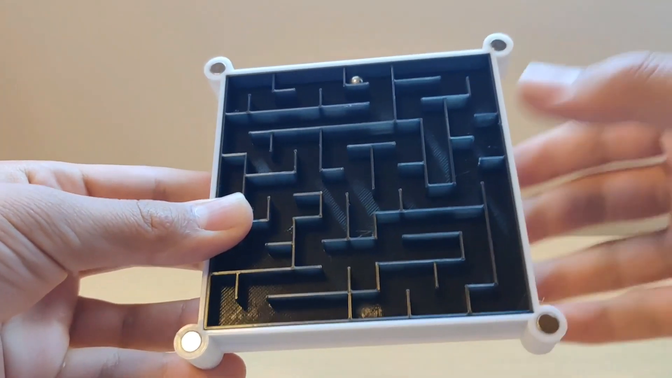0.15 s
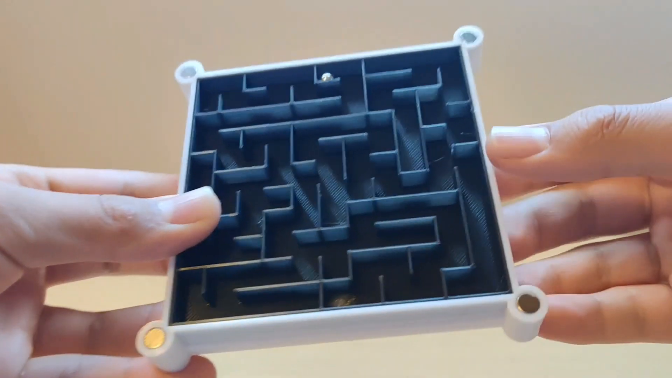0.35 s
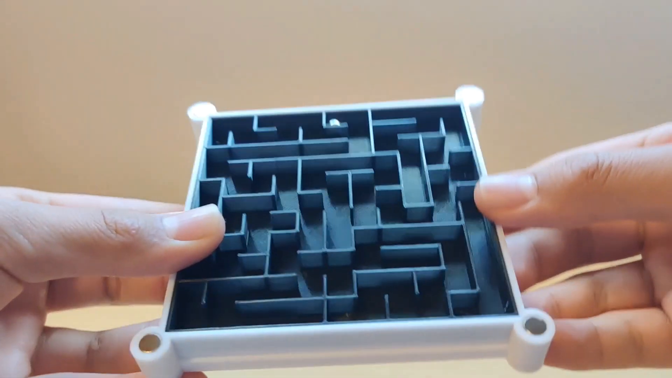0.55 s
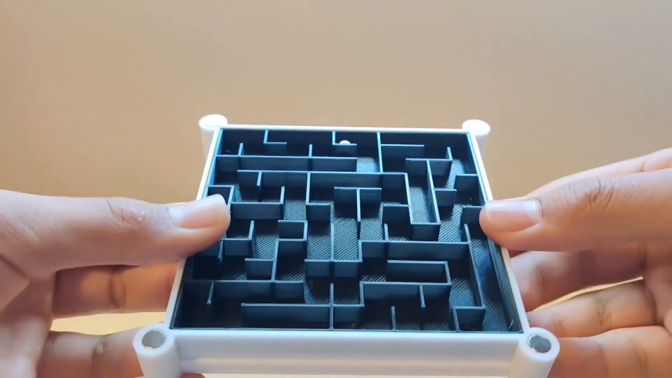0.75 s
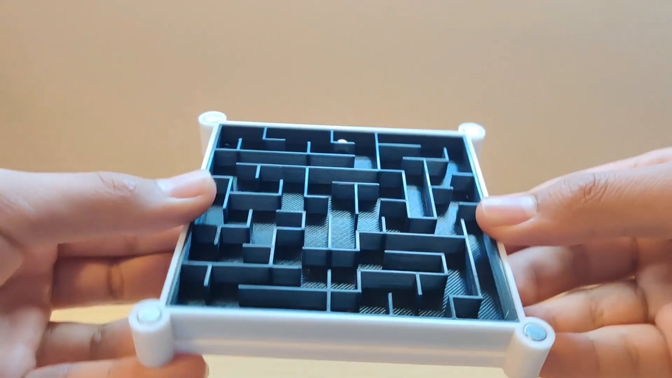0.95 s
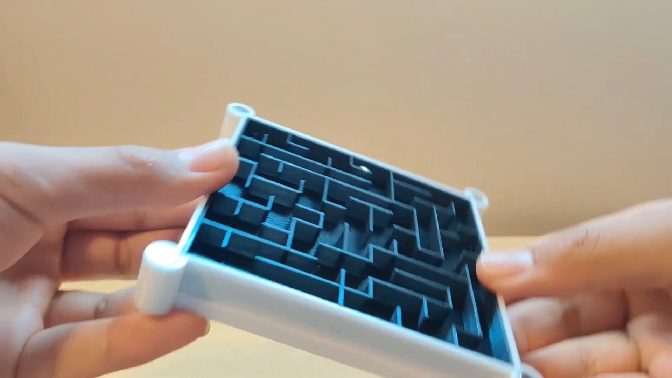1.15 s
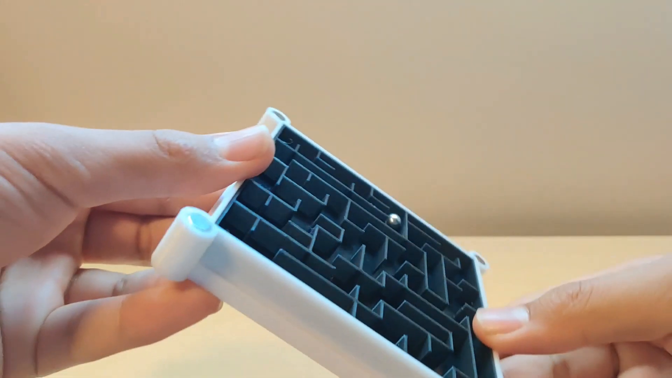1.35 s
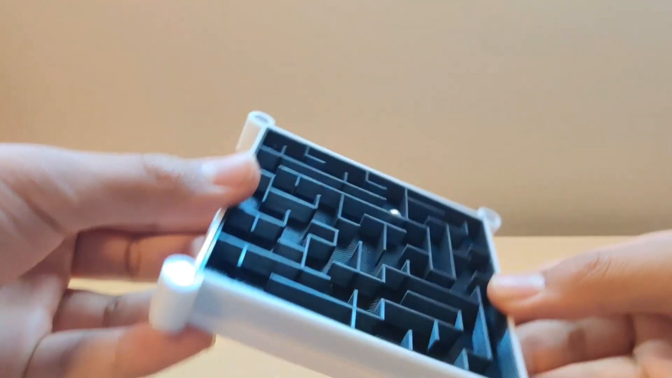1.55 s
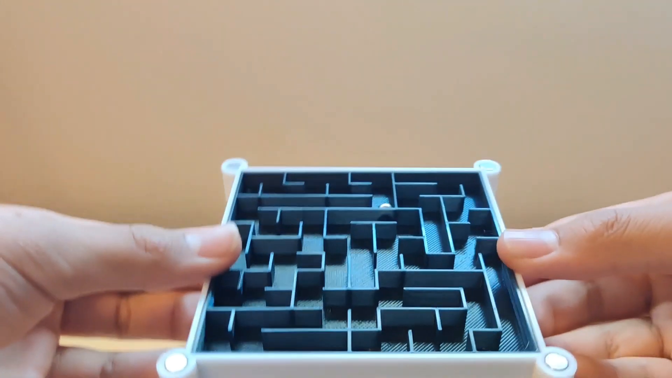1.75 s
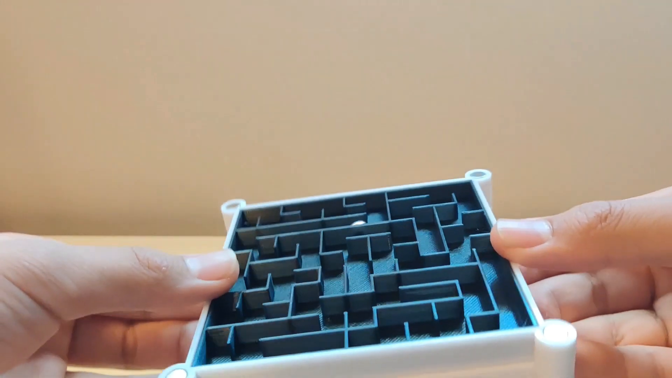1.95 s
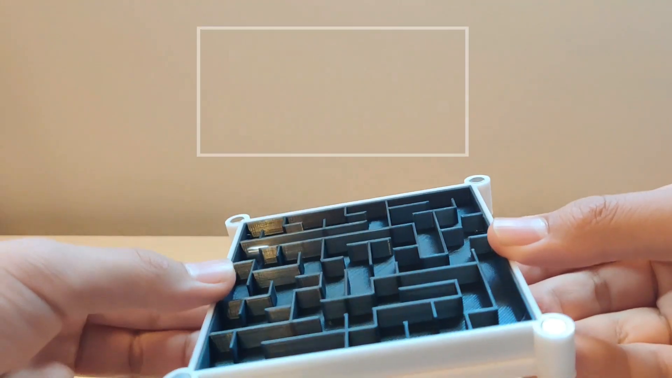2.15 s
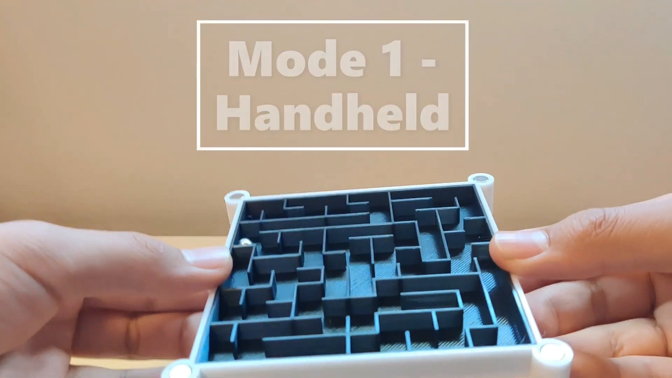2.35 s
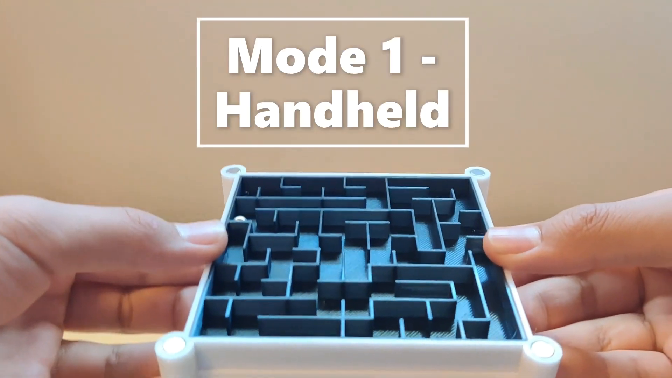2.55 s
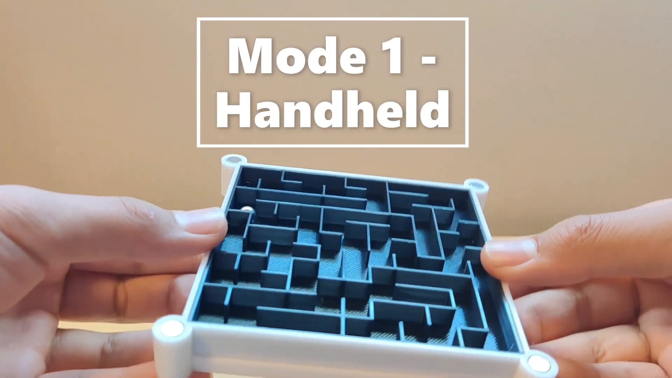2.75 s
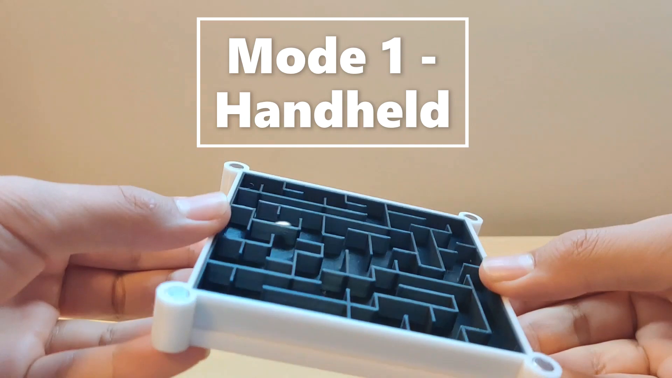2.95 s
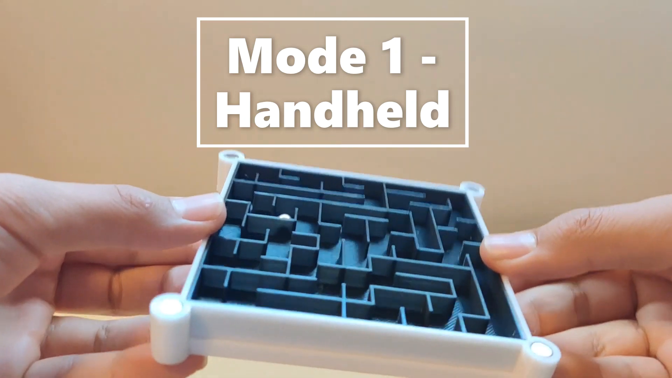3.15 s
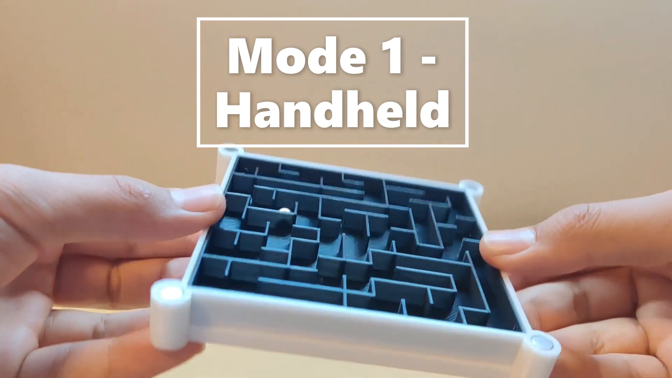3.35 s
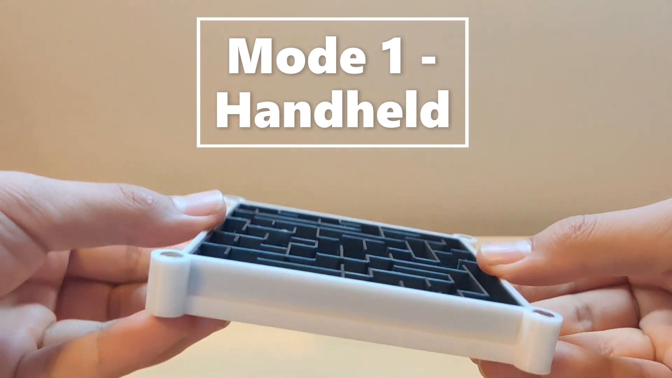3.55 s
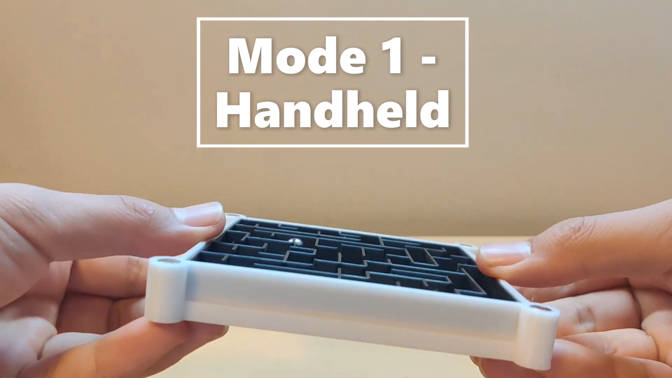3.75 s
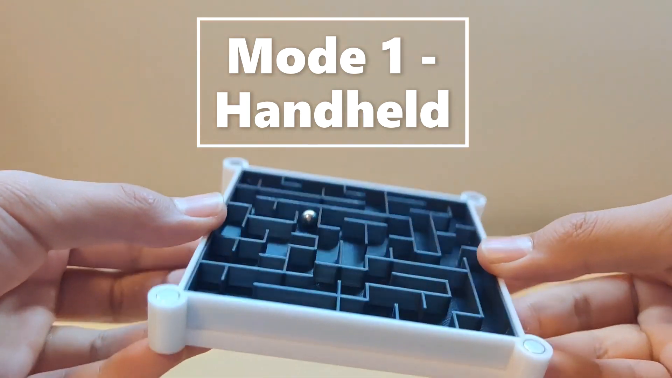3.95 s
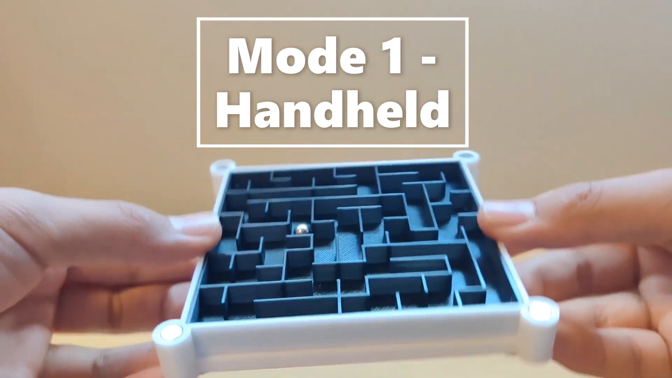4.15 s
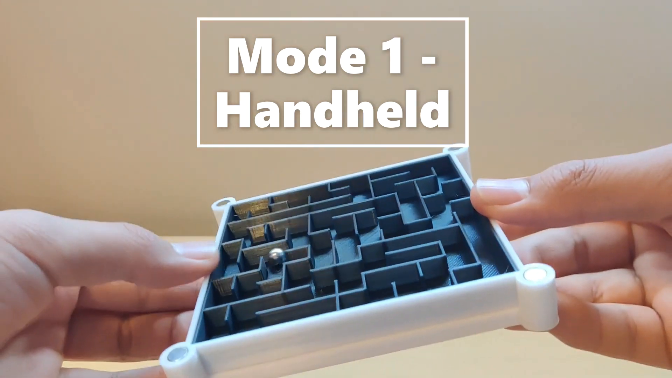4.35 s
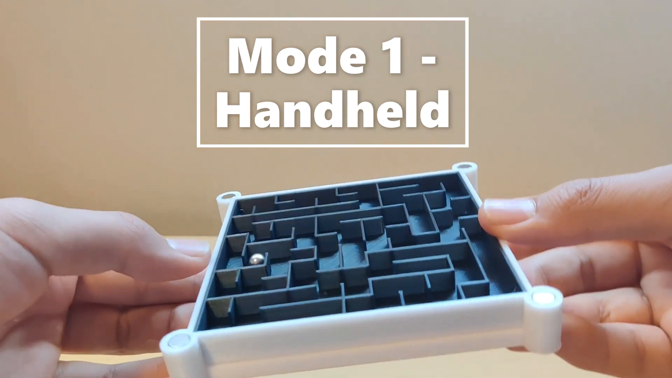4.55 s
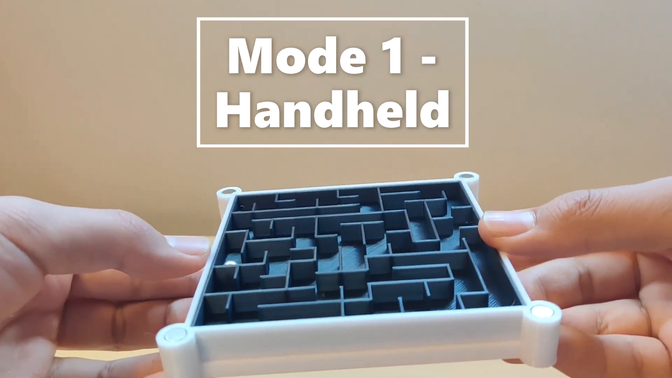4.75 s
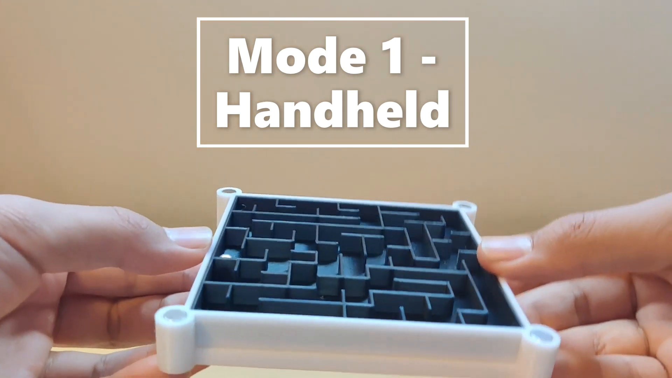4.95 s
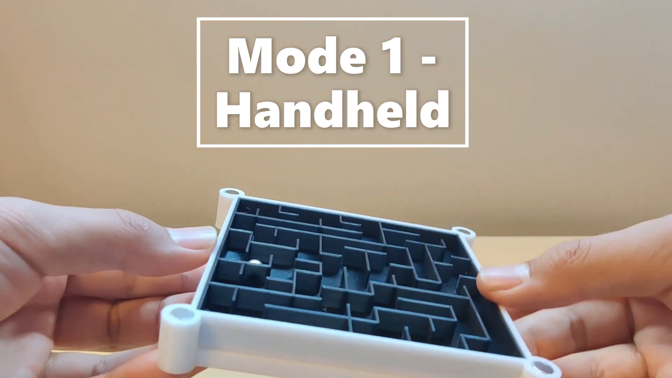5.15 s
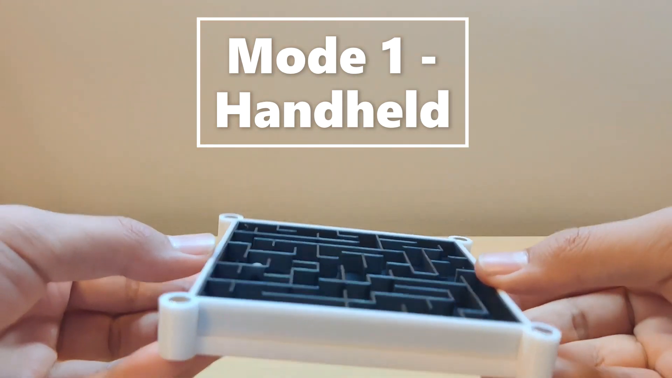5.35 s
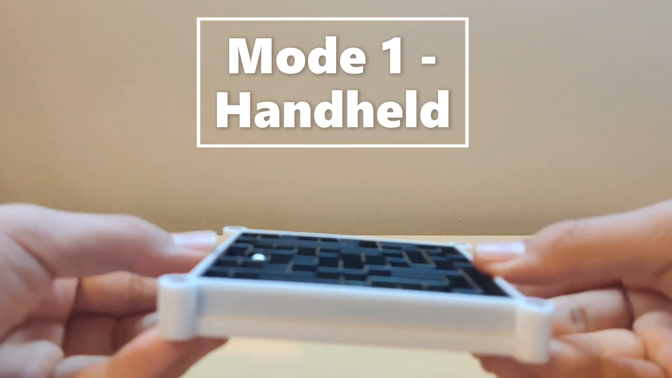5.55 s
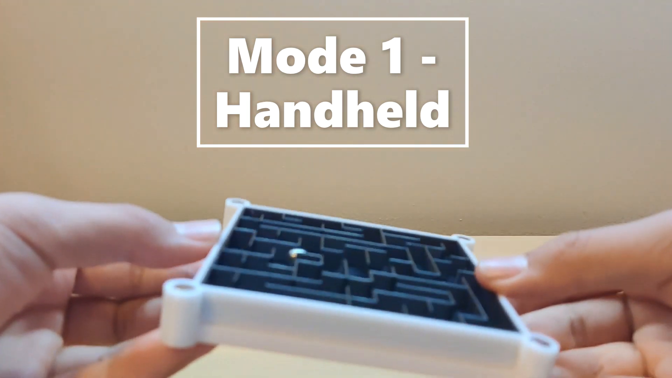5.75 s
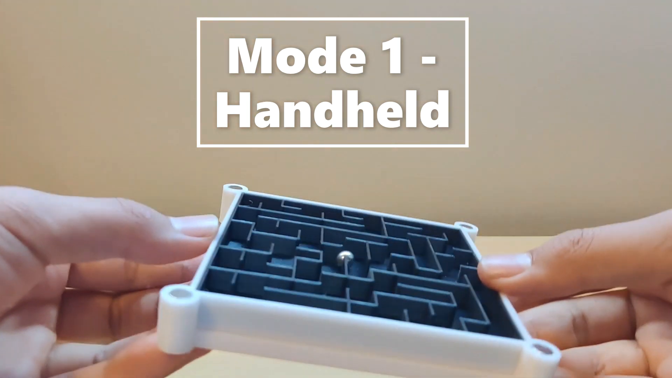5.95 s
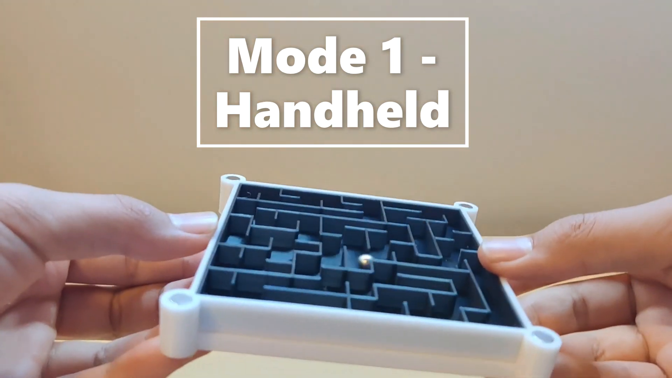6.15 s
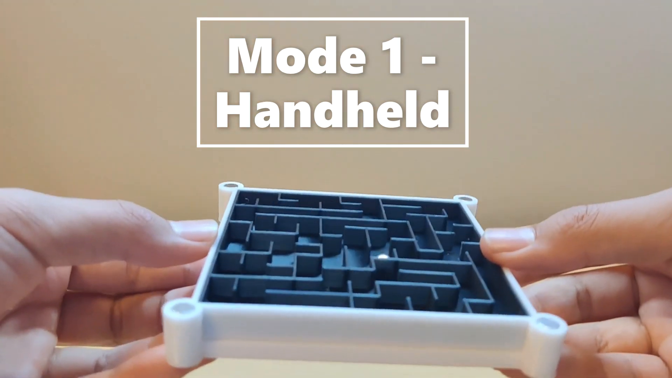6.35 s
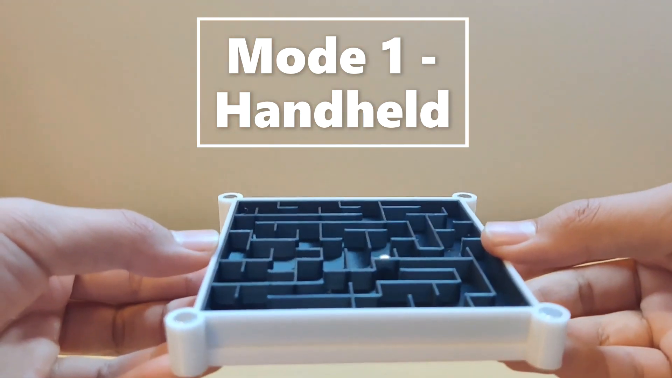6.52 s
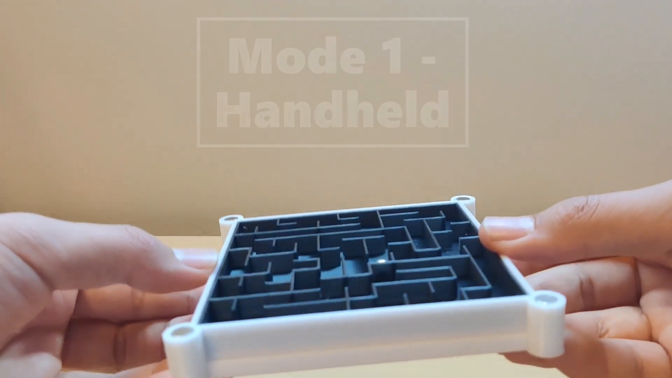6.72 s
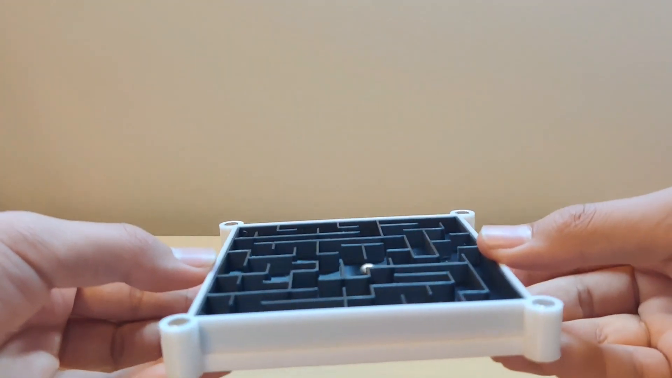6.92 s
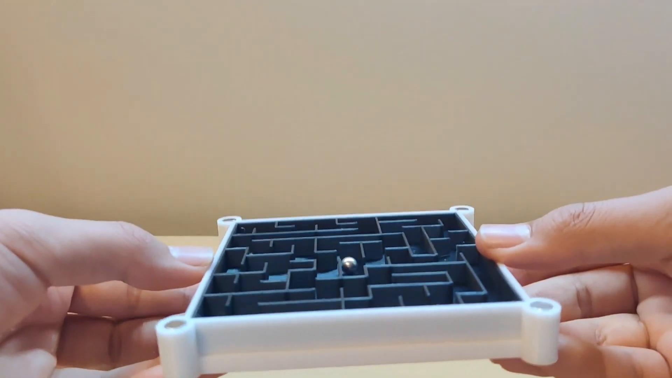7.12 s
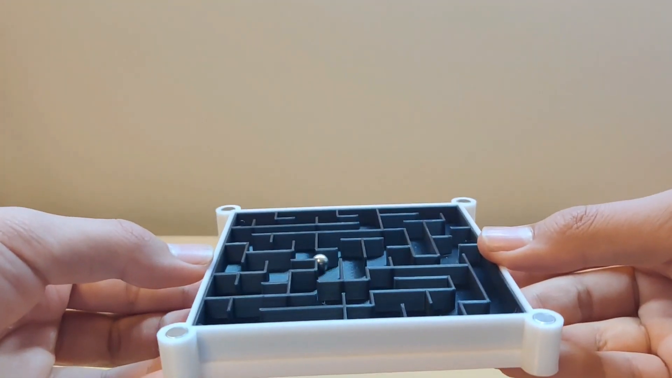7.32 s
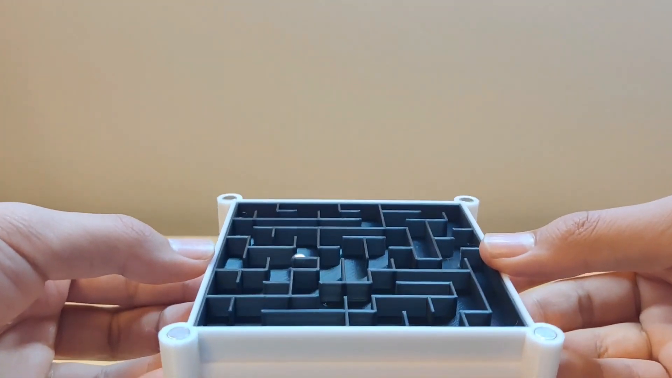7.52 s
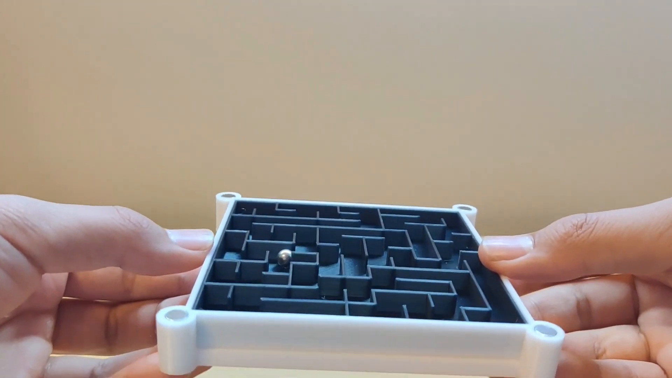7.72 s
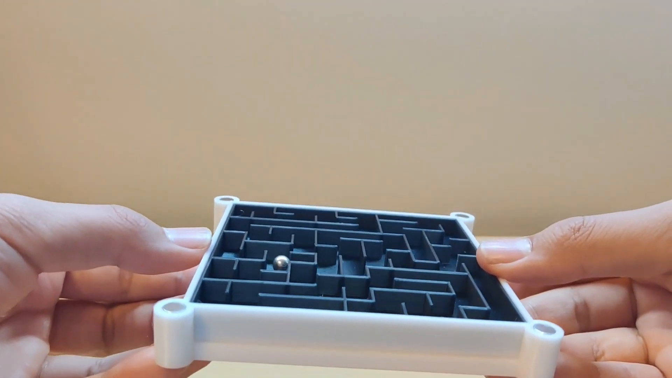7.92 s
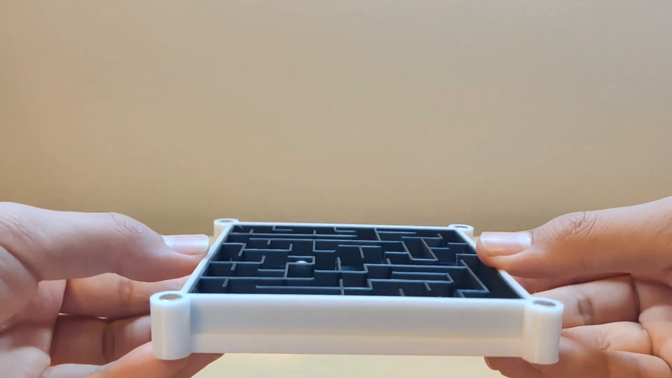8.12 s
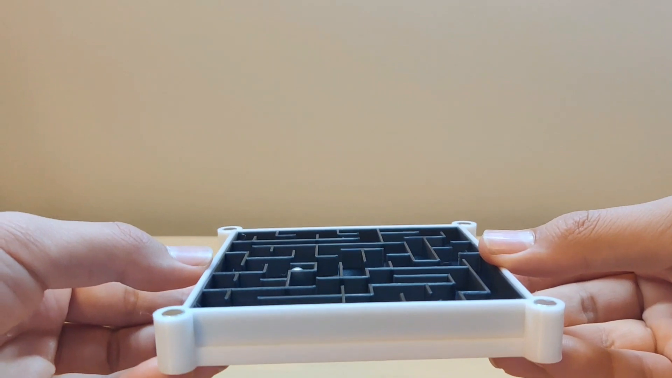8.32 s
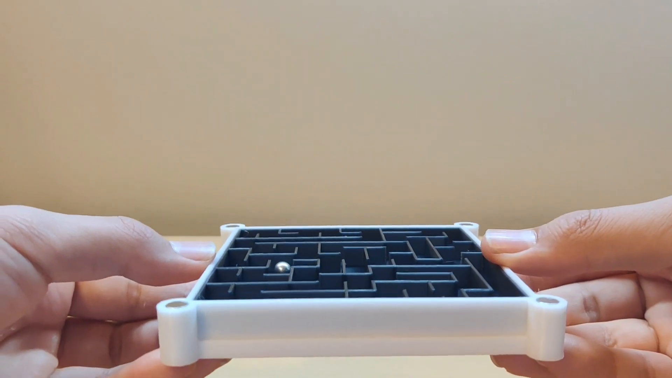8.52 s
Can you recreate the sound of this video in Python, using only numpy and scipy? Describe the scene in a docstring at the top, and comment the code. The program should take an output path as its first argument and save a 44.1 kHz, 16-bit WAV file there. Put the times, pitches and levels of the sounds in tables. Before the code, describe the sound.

A small steel ball rattles and clicks through a hand-tilted plastic maze, rolling in short bursts over a steady low fan hum.

```python
"""Over a fan that hums steadily from start to end, a faint knock opens the scene.
From 1.3 s a small steel ball runs through a hand-held plastic maze, close by in a small room, in bursts of runs.
It drums and grinds over the ribbed floor, knocks against the walls and rebounds; knocks and ribs are short
contacts that ring the damped modes of the tray. A deep rumble swells near 3.3, 6.5 and 7.3 s.
The last runs and knocks, past 8 s, are faint and leave the fan and the hiss of the microphones."""
import sys
import numpy as np
from scipy import signal
from scipy.fft import rfft, irfft, next_fast_len
from scipy.io import wavfile
from scipy.ndimage import uniform_filter1d

SR = 44100
rng = np.random.default_rng(int(sys.argv[2]) if len(sys.argv) > 2 else 0)


def store_pcm(level_fs):
    """Save levels as 16-bit WAV."""
    pcm = np.round(np.clip(level_fs, -1, 1) * 32767).astype(np.int16)
    wavfile.write(sys.argv[1], SR, np.atleast_2d(pcm).T)


N = 378378
TIME = np.arange(N) / SR

# Ball meets wall. Each row: time in seconds, pitch of that wall in Hz, strength in dB,
# hardness of the contact in dB per octave.
KNOCKS = [(0.39, 7250, -69, -3), (1.2045, 2830, -71.5, -7), (1.333, 4750, -57.5, -4.5),
          (1.3591, 5000, -38, 1.5), (1.378, 8450, -46, -1), (1.4009, 4900, -41.5, 1),
          (1.4406, 4940, -42, 1.5), (1.465, 5460, -46, 0.5), (1.5829, 5300, -35.5, 2.5),
          (1.6635, 4660, -45.5, 1.5), (1.704, 9200, -53.5, 1), (1.7257, 9150, -58.5, -2.5),
          (2.283, 6575, -33.5, 3.5), (2.3005, 6400, -39.5, 0.5), (2.3109, 5640, -33.5, 5.5),
          (2.3733, 6500, -44.5, 4), (2.4653, 4640, -40.5, 2.5), (2.552, 4550, -47.5, 1),
          (2.605, 4730, -54.5, 2.5), (2.6275, 6600, -62, 2), (2.9608, 12700, -44, 4),
          (2.976, 4690, -51, -3), (3.0132, 8600, -39.5, 2.5), (3.036, 6476, -47.5, 1),
          (3.0596, 8500, -42.5, 4), (3.0811, 8200, -44, -1.5), (3.161, 8250, -52, -1),
          (3.1795, 6670, -47.5, -1), (3.231, 6300, -60.5, -2.5), (3.256, 6694, -67, -2),
          (3.787, 6620, -42, 3), (3.879, 8000, -48.5, 2.5), (3.916, 6765, -44, 2.5),
          (4.0304, 6750, -49.5, 1), (4.072, 6655, -62, 4), (4.1996, 6640, -34.5, 1.5),
          (4.308, 7595, -44.5, -0.5), (4.4025, 7080, -41, 2.5), (4.4956, 6762, -43, 2),
          (4.5522, 8000, -40.5, 0), (4.5883, 7170, -50, -0.5), (4.6246, 7870, -44, 3),
          (4.716, 4571, -43, -0.5), (4.804, 8550, -51, 0.5), (4.823, 4560, -46, 0), (4.861, 7483, -63, 2),
          (4.969, 4700, -71.5, -6), (5.1645, 6797, -64, -4), (5.22, 7102, -43, 1), (5.2925, 7010, -55, -3),
          (5.323, 7108, -61.5, -4.5), (5.6298, 8040, -42.5, 1.5), (5.7324, 8259, -50, 2.5),
          (5.7863, 6892, -59, 0), (5.9005, 7850, -50, -1), (5.93, 4708, -52.5, -1), (5.9735, 8526, -34, 4),
          (6.0808, 5624, -59.5, -3), (6.1105, 8470, -43.5, 2), (6.255, 4799, -39, 0),
          (6.3344, 7510, -43, 4), (6.4001, 4790, -53, -3), (6.457, 7767, -57, -2.5),
          (7.0163, 2989, -67.5, -8), (7.111, 7220, -44.5, 3.5), (7.269, 2933, -66, -6.5),
          (7.312, 7730, -60, 2.5), (7.3864, 4930, -44, 0), (7.4255, 4770, -60, 0.5),
          (7.481, 4959, -53.5, 0.5), (7.53, 6610, -63, -1), (8.0536, 7700, -55, -2),
          (8.094, 9086, -57.5, -0.5), (8.2232, 4513, -53.5, -2.5), (8.277, 7543, -62.5, -1.5)]
# Borders between body, knock, click and snap of a knock, in Hz.
KNOCK_EDGES_HZ = [3100, 6200, 10500]
# Colour of an average knock over its first 10 ms, from body to snap. Each row: band centre in Hz, relative level in dB.
KNOCK_COLOUR = [(2000, 0.5), (4600, -2), (7900, -1.5), (12500, -7)]
HARDNESS_PIVOT_HZ = 5930   # a harder contact lifts what lies above and thins what lies below
WALL_LIFT_DB, WALL_LIFT_OCTAVES = 5.5, 0.24   # the struck wall favours the region around its own pitch
# The struck wall's own ring: level against the tray's before the knock is coloured, decay, half-width
WALL_DB, WALL_T60_S, WALL_WIDTH_HZ = -8.5, 0.03, 490

# Modes of the tray. Each row: frequency in Hz, relative level in dB, left over right in dB.
TRAY_MODES = [(810, -5, 0), (1090, 0.5, -1.5), (1430, -9, 17.5), (1534, -3.5, -1), (1716, -6.5, 13.5),
              (2027, 4, -4.5), (2143, -1, 8), (2930, 3, 1), (4200, -30, 2), (4696, -3.5, 9),
              (5345, -3.5, 7.5), (5765, -3, -11), (6550, -0.5, 3), (6940, -30, -20), (7390, -1, -0.5),
              (8020, 0, -7.5), (8260, -6, -3), (8730, -3, 6), (9270, -4.5, 9.5), (9950, -1, 1),
              (10840, -4, 3.5), (15070, -6, 3)]
TRAY_T60_S, TRAY_DAMPING = .04, .33   # decay of the lowest mode; how much sooner higher ones die
SPOT_SPREAD_DB = 4.0      # a mode answers up to this much louder or softer, depending on the spot
LEFT_LEAD_S = .00009
# Crowd of heavily damped wall modes, heard as a crack. Each row: frequency in Hz, relative level in dB.
CRACK = [(150, 19), (600, -9), (900, 5), (2200, 16.5), (3500, 8), (6000, 3.5), (9000, 0.5), (12000, -5),
         (14000, -5), (15300, -6)]
CRACK_DB, CRACK_T60_S, CONTACT_S = 11, 0.026, 0.00058   # the contact time softens the onset
CRACK_PAN = .8   # share of the tray's left-right balance that the crack follows
RING = 4096   # length of a ring in samples

# The ball runs down a corridor. Each row: sets off in seconds, reaches the wall in seconds,
# comes to rest in seconds, rolling at top speed in dB, floor drumming at top speed in dB.
RUNS = [(1.306, 1.352, 1.413, -45, -62.5), (1.379, 1.582, 1.778, -49, -52), (1.94, 2.285, 2.466, -41, -50),
        (2.27, 2.464, 2.71, -48, -57), (2.881, 2.95, 3.12, -47, -59), (2.931, 3.08, 3.284, -49, -56),
        (3.68, 3.789, 4.015, -55, -58.5), (4.0, 4.202, 4.29, -45, -48), (4.25, 4.401, 4.46, -54.5, -52.5),
        (4.421, 4.55, 4.754, -48, -54), (4.66, 4.803, 4.9, -59, -63), (5.12, 5.219, 5.38, -55, -64),
        (5.52, 5.63, 5.71, -52, -60.5), (5.779, 5.971, 6.14, -42, -45), (6.12, 6.253, 6.56, -50.5, -46),
        (6.94, 7.09, 7.2, -59, -51), (7.12, 7.249, 7.4, -63.5, -52), (7.22, 7.385, 7.55, -68, -52.5),
        (7.951, 8.051, 8.075, -57, -60.5), (8.138, 8.217, 8.26, -63, -62)]
REBOUND = .48   # share of its speed that the ball keeps at the wall
ROLL_POWER, DRUM_POWER = 2.0, .95   # amplitude of rolling and drumming grows as this power of the speed
# Where the ball is. Each row: time in seconds, nearness to the middle of the floor from 0 to 1.
MIDDLE = [(5.8, 0.1), (6.08, 0.86), (7.45, 0.51), (7.9, 0)]
# Borders between drumming, rolling and grit, in Hz.
ROLL_EDGES_HZ = [1200, 3200]
FLOOR_HZ, FLOOR_WIDTH_HZ = 1001, 196   # the floor's drum mode, strongest in the middle
GRIT_DB, MIDDLE_GRIT_DB = -8.5, 9   # treble of the rolling against its body; the middle of the floor adds some
RIB_RATE, RIB_LOUD_DB = 175.0, -45   # ribs crossed per second when the ball runs at this level
RIB_DOUBLING_DB = 12.0   # so much louder, twice the ribs per second

# Reflections: level against the ball, decay of the lows, decay of the treble
ROOM_DB, ROOM_T60_S, ROOM_TOP_T60_S = -8, 0.14, 0.15

# Rush of the fan and ventilation. Each row: frequency in Hz, relative density in dB per Hz.
FAN = [(15, 0), (40, -4.5), (77, -5.5), (90, -24), (109, -30), (135, -9), (175, -19), (290, -15),
       (460, -19), (540, -29.5), (1100, -34), (2000, -39), (3400, -42.5), (5500, -50)]
FAN_DB = -47.5
# Hum of the fan. Each row: centre in Hz, half-width in Hz, level before panning in dB.
HUM = [(117.5, 3.5, -58), (200, 5, -58.5), (258.5, 3.5, -58), (470, 14, -67), (797, 8, -81)]
# Left-right likeness of the background noise. Each row: frequency in Hz, correlation from -1 to 1.
LIKENESS = [(60, 0.97), (130, 1), (290, 0.85), (640, 0.26), (1400, -0.59), (3100, 0.13), (15000, -0.22)]
# Deep rumble that comes and goes. Each row: time in seconds, level in dB.
RUMBLE = [(2.8, -67), (3.3, -45), (3.7, -63), (5.9, -62), (6.45, -52), (6.9, -60), (7.27, -44), (7.5, -48),
          (8.0, -65.5)]
# Hiss of the left microphone. Each row: frequency in Hz, relative density in dB per Hz.
HISS_LEFT = [(1000, -43), (8600, -19), (10000, -5.5), (12000, -8), (15500, -4.5)]
# Hiss of the right microphone. Each row: frequency in Hz, relative density in dB per Hz.
HISS_RIGHT = [(1000, -7), (8600, -17), (15500, -1)]
# Level of the hiss, left and right, in dB.
HISS_DB = (-66.5, -69.5)
CUTOFF_HZ = 15950


def knocks():
    """A knock rings the struck wall and the whole tray, with a colour that depends on the spot."""
    out = np.zeros((2, N))
    table = np.array(KNOCKS)
    first = SR // 100   # 10 ms
    tray = rms_one(tray_rings(count=len(table)))
    struck = tray + from_db(WALL_DB) * wall_rings(table[:, 1])
    bands = split(struck, KNOCK_EDGES_HZ)
    level = np.sqrt(np.mean(bands[..., :first] ** 2, axis=(2, 3)))
    gain = from_db(knock_colours()) / level
    rings = np.sum(bands * gain[..., None, None], axis=0)
    for s, ring in zip(table[:, 0], rings):
        add(out, int(s * SR), ring)
    return out


def knock_colours():
    """Harder contacts are brighter and the struck wall stands out: bands x knocks, dB."""
    _, wall_hz, strength_db, hardness = np.transpose(KNOCKS)
    hz, colour_db = np.transpose(KNOCK_COLOUR)[:, :, None]
    near_wall = np.exp(-.5 * (np.log2(hz / wall_hz) / WALL_LIFT_OCTAVES) ** 2)
    tilt_db = hardness * np.log2(hz / HARDNESS_PIVOT_HZ)
    return strength_db + colour_db + tilt_db + WALL_LIFT_DB * near_wall


def wall_rings(pitch_hz):
    """Each thin wall rings broadly at its own pitch, louder on the side where the tray radiates that pitch."""
    hz, _, pan = np.transpose(TRAY_MODES)
    t = np.arange(RING) / SR
    centre = pitch_hz[:, None, None]
    noise = rng.standard_normal((len(centre), 2, RING))
    ring = shaped(noise, lambda f: 1 / (1 + ((f - centre) / WALL_WIDTH_HZ) ** 2))
    envelope = dying(t, WALL_T60_S) * (1 - np.exp(-t / CONTACT_S))
    ring = ring * envelope * from_db(np.interp(centre, hz, pan) * [[.5], [-.5]])
    return ring / np.std(ring, axis=(1, 2), keepdims=True)


def tray_rings(count):
    """Damped modes and a noisy crack for taps on different spots of the tray: count x 2 x RING."""
    hz, db, pan = np.transpose(TRAY_MODES)
    t60 = TRAY_T60_S * (hz[0] / hz) ** TRAY_DAMPING   # plastic damps high modes sooner
    t = np.arange(RING) / SR
    draws = rng.standard_normal((count, 2, RING + 2 * len(hz)))
    noise, strength, phase = np.split(draws, [RING, RING + len(hz)], axis=2)

    spot_db = SPOT_SPREAD_DB * np.tanh(strength[:, :1])
    gain = from_db(db + spot_db + pan * [[.5], [-.5]])
    # low modes reach both microphones alike, high ones radiate unevenly
    angle = 2 * np.pi * (phase[:, :1] + hz * [[LEFT_LEAD_S], [0]]) + phase * hz / 3500
    modes = np.exp(2j * np.pi * hz[:, None] * t) * dying(t, t60[:, None])
    weights = (gain * np.exp(1j * angle)).reshape(-1, len(hz))
    ring = (weights @ modes).real.reshape(noise.shape)

    low, high = split(noise, [2400])
    crack_noise = left_first(low[:, :1]) + high   # lows shared by both sides, highs separate

    def crack_colour(f):
        return from_db(at_hz(CRACK, f) + CRACK_PAN * np.interp(f, hz, pan) * [[.5], [-.5]])

    crack = rms_one(shaped(crack_noise, crack_colour)) * dying(t, CRACK_T60_S)
    return (ring + from_db(CRACK_DB) * crack) * (1 - np.exp(-t / CONTACT_S))


def rolling(pan_db, soft_hz):
    """The ribs and fine grain of the floor tap the tray; its ring changes as the ball moves on."""
    drum_db, roll_db = run_levels()
    middle = np.clip(np.interp(TIME, *np.transpose(MIDDLE)), 0, 1)
    ribs = rib_ticks(np.maximum(roll_db, drum_db), unevenness=.25)
    bumps = ribs + .4 * rng.standard_normal(N)   # the noise is the fine grain

    stretch = 1024   # samples for which the tray keeps one ring
    count = N // stretch
    run = np.zeros((2, N))
    pieces = bumps[:count * stretch].reshape(count, 1, stretch)
    rung = signal.fftconvolve(pieces, tray_rings(count=count), axes=2)
    for k, piece in enumerate(rung):
        add(run, k * stretch, piece)

    drum, roll, grit = split(run, ROLL_EDGES_HZ)
    # rolling contact is softer than a knock
    grit = shaped(grit, lambda hz: 1 / np.sqrt(1 + (hz / soft_hz) ** 4))
    floor_band = FLOOR_HZ + FLOOR_WIDTH_HZ * np.array([-.5, .5])
    floor = signal.sosfilt(signal.butter(2, floor_band, "band", fs=SR, output="sos"), bumps)
    # the floor's own mode takes over towards the middle
    drum = np.sqrt(middle) * evened(left_first(floor)) + np.sqrt(1 - middle) * evened(drum)
    grit_db = roll_db + GRIT_DB + MIDDLE_GRIT_DB * middle
    out = from_db(drum_db) * evened(drum) + from_db(roll_db) * evened(roll) + from_db(grit_db) * evened(grit)
    return out * from_db([[pan_db / 2], [-pan_db / 2]])


def run_levels():
    """The ball speeds up evenly down the slope, rebounds more slowly and coasts to rest: drumming and rolling in dB."""
    drum = roll = np.full(N, 1e-6)
    for start, wall, rest, roll_db, drum_db in RUNS:
        speeding_up = (TIME - start) / (wall - start)
        coasting = REBOUND * (rest - TIME) / (rest - wall)
        speed = np.clip(np.where(TIME < wall, speeding_up, coasting), 0, 1)   # share of the top speed
        # where runs overlap the louder one counts
        drum = np.maximum(drum, from_db(drum_db) * speed ** DRUM_POWER)
        roll = np.maximum(roll, from_db(roll_db) * speed ** ROLL_POWER)
    return 20 * np.log10([drum, roll])


def rib_ticks(roll_db, unevenness):
    """One tick per rib crossed, closer together in a louder run and scaled to keep the train's power even."""
    per_s = np.maximum(RIB_RATE * 2 ** ((roll_db - RIB_LOUD_DB) / RIB_DOUBLING_DB), 20)
    ribs = np.cumsum(per_s) / SR   # ribs crossed so far
    gap, force = unevenness * rng.uniform(-1, 1, (RING, 2)).T
    places = np.cumsum(1 + gap)
    crossed = places < ribs[-1]
    at = np.searchsorted(ribs, places[crossed])
    train = np.zeros(N)
    train[at] = (1 + 2 * force[crossed]) * np.sqrt(SR / per_s[at])
    return train


def room(x, gap_s, dull_hz):
    """Diffuse reflections from desk and walls, as decaying noise; the treble is weaker."""
    t = np.arange(SR // 2) / SR
    low, high = split(rng.standard_normal((2, len(t))), [dull_hz])
    tail = low * dying(t, ROOM_T60_S) + high * 0.53 * dying(t, ROOM_TOP_T60_S)
    tail = tail * np.clip(t / gap_s - 1, 0, 1)   # silent for the gap, then fades in over as long
    return signal.fftconvolve(x, rms_one(tail) / np.sqrt(len(t)), axes=1)[:, :N]


def fan(hum_pan_db):
    """A low rush of air with narrow, wavering hum lines, all made of filtered noise."""
    rush = from_db(FAN_DB) * room_noise(lambda hz: from_db(at_hz(FAN, hz)))
    hum = np.zeros((2, N))
    for centre, width, db in HUM:
        hum += from_db(db) * room_noise(lambda hz: 1 / (1 + ((hz - centre) / width) ** 2))
    return rush + hum * from_db([[hum_pan_db / 2], [-hum_pan_db / 2]])


def rumble(centre_hz):
    """Slow swells of noise at the very bottom."""
    swell = from_db(np.interp(TIME, *np.transpose(RUMBLE)))
    return swell * room_noise(lambda hz: np.exp(-2 * np.log2(hz / centre_hz) ** 2))


def hiss():
    """Each microphone has its own faint hiss of coloured noise."""
    sides = []
    for colour, db in zip((HISS_LEFT, HISS_RIGHT), HISS_DB):
        noise = shaped(rng.standard_normal(N), lambda hz: from_db(at_hz(colour, hz)))
        sides.append(from_db(db) * rms_one(noise))
    return np.array(sides)


def room_noise(gain_at):
    """Stereo noise of rms 1 whose mid and side set how alike the channels are at each frequency."""
    def likeness(hz):
        return np.clip(at_hz(LIKENESS, hz), -1, 1)

    mid, side = rng.standard_normal((2, N))
    mid = shaped(mid, lambda hz: gain_at(hz) * np.sqrt(1 + likeness(hz)))
    side = shaped(side, lambda hz: gain_at(hz) * np.sqrt(1 - likeness(hz)))
    return rms_one(np.array([mid + side, mid - side]))


def left_first(x):
    """One sound at both microphones, the right one a little later."""
    return shaped(x, lambda hz: np.exp(-2j * np.pi * hz * [[0], [LEFT_LEAD_S]]))


def evened(x):
    """Unit level over some 60 ms; single taps still stand out."""
    return x / np.sqrt(uniform_filter1d(np.mean(x ** 2, axis=0), size=2600) + 1e-12)


def from_db(db):
    """Decibels to gain."""
    return 10 ** (np.asarray(db) / 20)


def rms_one(x):
    """Scale to unit rms."""
    return x / np.sqrt(np.mean(x ** 2) + 1e-20)


def bins(size):
    """Frequencies of a transform of this length, in Hz, none below 1."""
    return np.maximum(np.arange(size // 2 + 1) * SR / size, 1)


def at_hz(points, hz):
    """Read a spectrum on a log-frequency axis."""
    point_hz, value = np.transpose(points)
    return np.interp(np.log(hz), np.log(point_hz), value)


def dying(t, t60):
    """Exponential decay by 60 dB in t60 seconds."""
    return np.exp(-np.log(1000) * t / t60)


def shaped(x, gain_at):
    """Filter by a gain that is a function of frequency."""
    size = next_fast_len(x.shape[-1], True)
    return irfft(rfft(x, size) * gain_at(bins(size)), size)[..., :x.shape[-1]]


def split(x, edges):
    """Neighbouring bands that add up to x again."""
    below = [shaped(x, lambda hz: 1 / (1 + (hz / edge) ** 20)) for edge in edges]
    return np.diff([0 * x, *below, x], axis=0)


def add(track, start, sound):
    """Mix a stereo sound in at a sample index."""
    track[:, start:start + sound.shape[1]] += sound[:, :N - start]


def scene():
    """The ball in its maze, the room around it and the background."""
    ball = knocks() + rolling(pan_db=0.5, soft_hz=6100)
    reflections = from_db(ROOM_DB) * room(ball, gap_s=0.0011, dull_hz=4370)
    background = fan(hum_pan_db=3.5) + rumble(centre_hz=36.6) + hiss()
    return ball + reflections + background


def record(dry):
    """The top is cut steeply."""
    return shaped(dry, lambda hz: 1 / np.sqrt(1 + (hz / CUTOFF_HZ) ** 200))


dry = scene()
out = record(dry)
store_pcm(out)
```